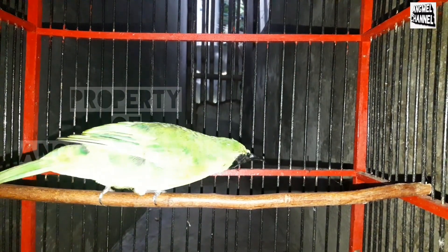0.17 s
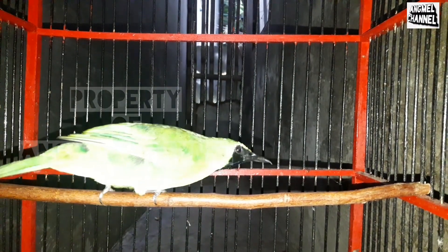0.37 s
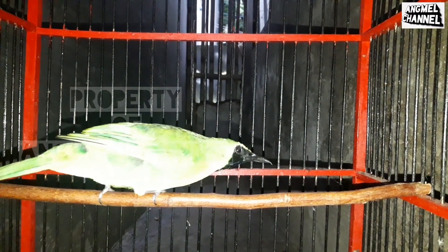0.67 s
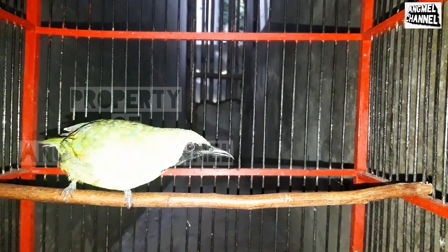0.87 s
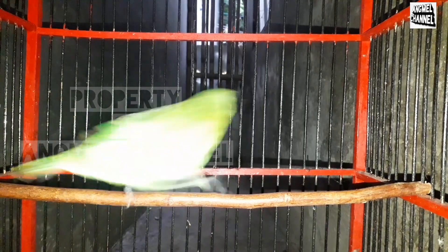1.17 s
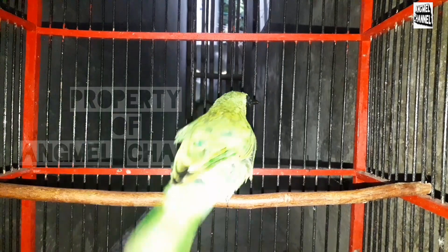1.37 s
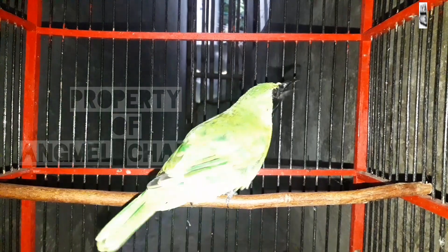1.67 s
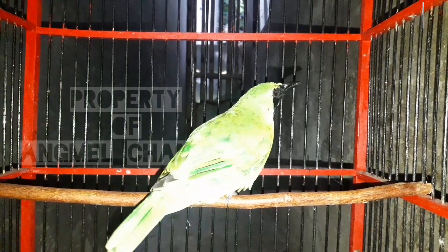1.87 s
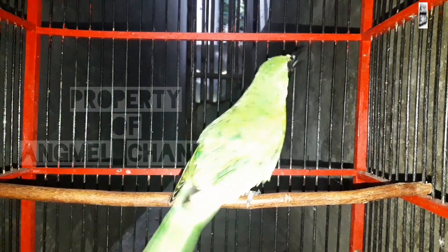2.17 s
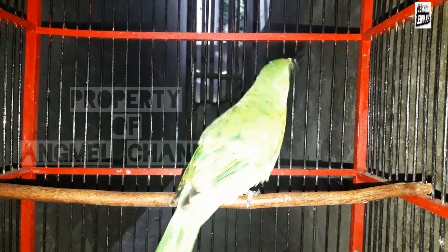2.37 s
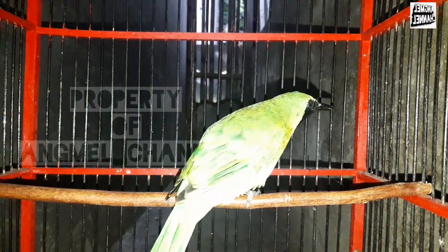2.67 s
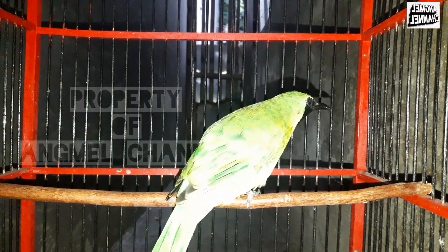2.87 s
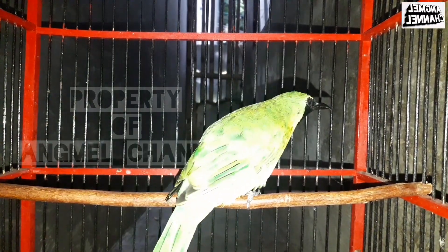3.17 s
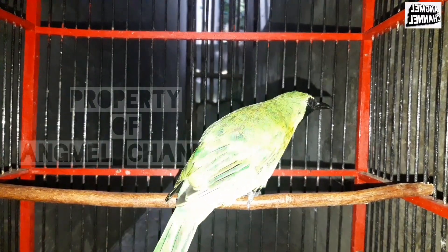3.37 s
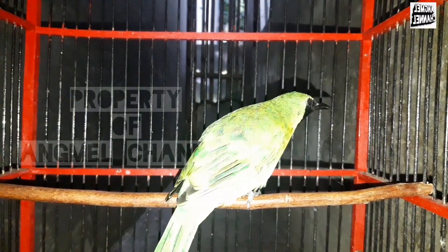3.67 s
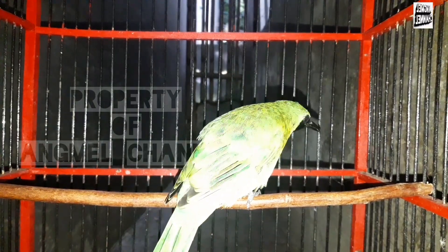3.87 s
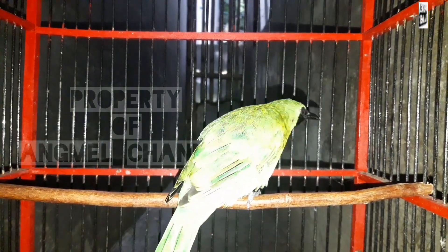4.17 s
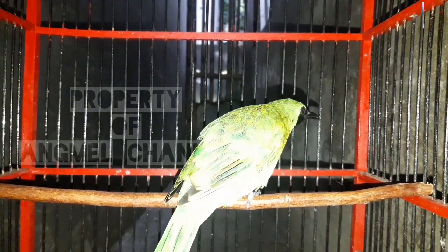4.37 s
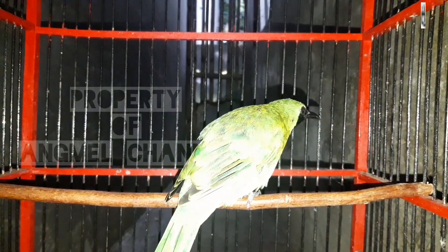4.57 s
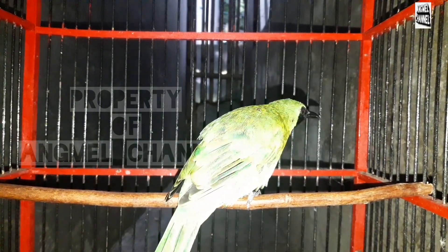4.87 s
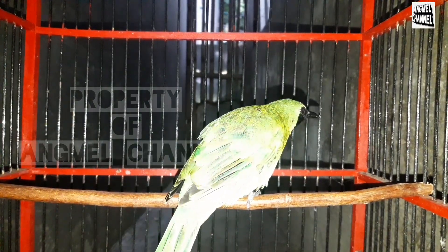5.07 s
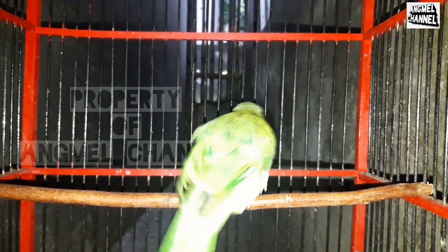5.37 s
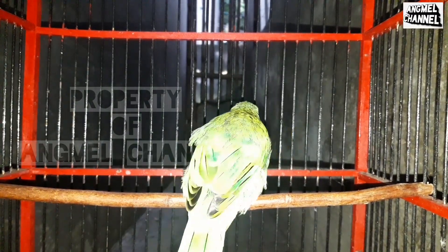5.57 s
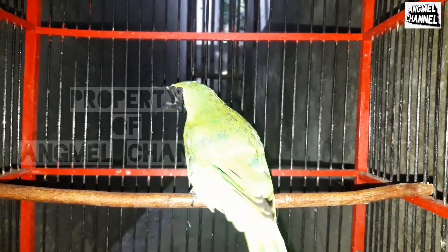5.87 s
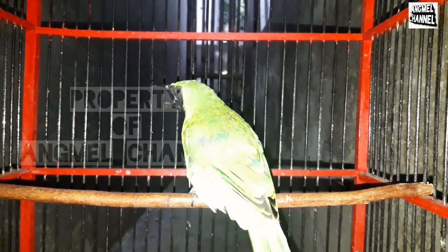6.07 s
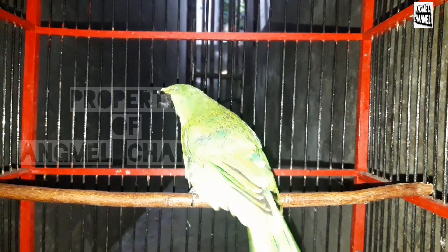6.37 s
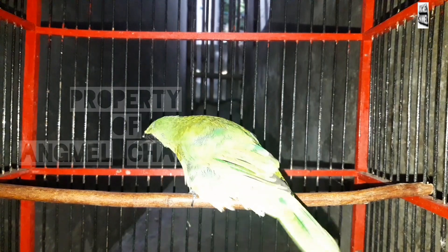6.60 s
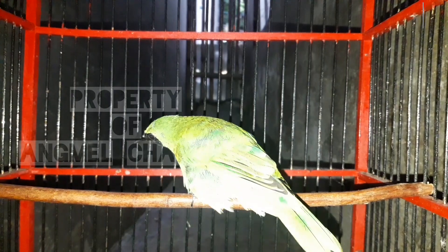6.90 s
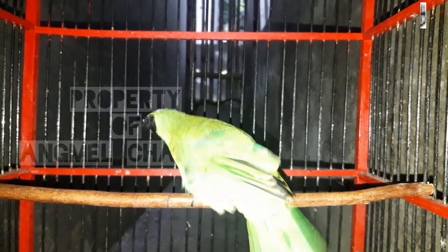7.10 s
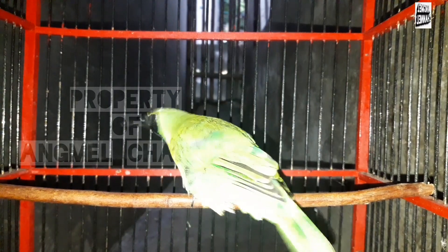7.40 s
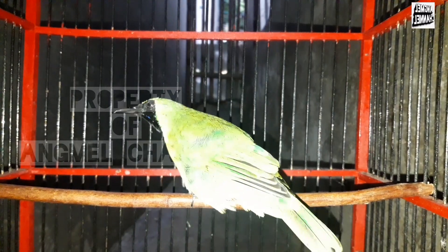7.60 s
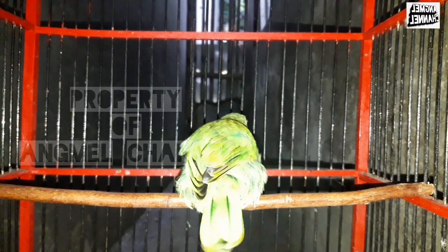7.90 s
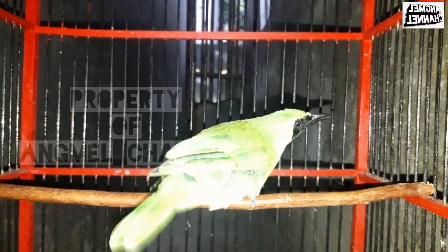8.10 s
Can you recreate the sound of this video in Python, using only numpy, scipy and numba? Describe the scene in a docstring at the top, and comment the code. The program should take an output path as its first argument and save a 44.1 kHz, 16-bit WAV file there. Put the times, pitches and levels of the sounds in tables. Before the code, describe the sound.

A close caged songbird sings two short phrases, each two sharp chips then three falling whistles, over faint low distant traffic hum.

```python
"""Distant traffic hums outside, with a waver of engine hum, faint tones and hiss; it cuts out once, briefly.
Then a caged songbird, close to the microphone, sings two sharp two-voiced chips and three falling whistles;
after a pause with light ticks of claws and feathers, it sings a second such phrase. Gliding sine tones make
the voice, coloured noise the scratches and clicks. A small hard room rings after each note, and the
recorder's gain control ducks the background during each phrase and lets it back afterwards."""
import sys
import numpy as np
from scipy import signal
from scipy.fft import rfft, irfft
from scipy.io import wavfile
from scipy.ndimage import uniform_filter1d, minimum_filter1d
from numba import njit

SR = 44100
rng = np.random.default_rng(int(sys.argv[2]) if len(sys.argv) > 2 else 0)


def to_wav(sig):
    """Store sig (one row per channel, or 1-D mono) as 16-bit WAV at the path in sys.argv[1].

    Samples outside -1..1 are clipped; the rate is SR.
    """
    pcm = np.clip(np.atleast_2d(sig), -1, 1) * 32767
    pcm = np.round(pcm).astype(np.int16)
    wavfile.write(sys.argv[1], SR, pcm.T)  # frames by channels


N = 363384
TIME = np.arange(N) / SR


def undb(db):
    """Decibels to gain."""
    return 10 ** (np.asarray(db) / 20)


def ease(part):
    """Smooth step from 0 to 1."""
    return np.sin(np.pi / 2 * np.clip(part, 0, 1)) ** 2


def noise(colour):
    """Noise of rms 1 with a spectrum drawn through (pitch_hz, level_db) points."""
    hz, db = np.transpose(colour)
    bins = np.maximum(np.fft.rfftfreq(N, 1 / SR), 1)
    gain = undb(np.interp(np.log(bins), np.log(hz), db))
    x = irfft(rfft(rng.standard_normal(N)) * gain, N)
    return x / x.std()


def walk(rate):
    """Smooth random wandering of spread 1, about rate turns a second."""
    size = max(int(SR / rate), 1)
    steps = np.interp(np.arange(N) / size, np.arange(N), rng.standard_normal(N))
    x = uniform_filter1d(steps, size)
    return x / x.std()


def swell(at, half):
    """A bell-shaped rise and fall around a moment."""
    out = np.zeros(N)
    near = slice(*np.searchsorted(TIME, (at - 4 * half, at + 4 * half)))
    out[near] = np.exp(-((TIME[near] - at) / half) ** 2)
    return out


def bursts(table, colour):
    """Short swells of coloured noise, from (centre_s, half_length_s, level_db) rows."""
    return noise(colour) * sum(undb(db) * swell(s, half) for s, half, db in table)


# The song, close to the microphone. Each note arches up to a crest, falls to a landing pitch, then drifts
# to its end; a roundness of 1 is a straight rise. Columns of both: start_s, length_s, rise_s, fall_s,
# first_hz, crest_hz, landing_hz, drift_hz_per_s, roundness, level_db, fade_db_per_s, overtones_db, scratch_db
CHIP_NOTES = [(1.577, 0.12, 0.033, .025, 3816, 4410, 3783, -900, 2.2, 5.5, -49, -0.5, -29.5),
              (1.738, 0.1, .049, 0.015, 4030, 4430, 4347, -3000, 1.0, 4, -15.5, -0.5, -43.5),
              (5.876, 0.15, 0.043, .032, 3978, 4460, 3862, -1600, .7, 1.5, -45.5, -2.5, -34.5),
              (6.041, 0.12, 0.031, 0.053, 4170, 4530, 4577, -400, .8, -3.5, -13, 5.5, -50)]
WHISTLE_NOTES = [(2.1, 0.093, 0.017, 0.061, 3327, 3630, 2903, 9000, 2.2, 3.8, -54.5, 1, -43.5),
                 (2.282, 0.093, .013, 0.046, 2850, 2997, 2537, -970, 0.92, 1.2, -50, -1.5, -45.5),
                 (2.462, 0.1, 0.03, 0.048, 2810, 3274, 2874, -3200, 1.7, 4.5, -32, -1.5, -40),
                 (6.356, 0.12, .032, 0.041, 3200, 3467, 3055, 597.5, 2.6, 3.83, -23, 2, -43),
                 (6.551, 0.076, 0.0043, .048, 2840, 2936, 2566, -1200, 1.7, 3.3, -11.5, -2, -40.5),
                 (6.749, 0.091, 0.033, .036, 3010, 3424, 2872, -3000, .9, 0.62, 52, -1, -56.5)]
# Upward flicks from the other side of the syrinx, one in each chip.
# Columns: start_s, length_s, level_db, scratch_db, pop_db
FLICK_NOTES = [(1.619, 0.024, -6.5, -20.5, -22.5), (1.784, 0.011, -6.5, -26.5, -29),
               (5.92, 0.025, -7.5, -27, -40), (6.077, 0.022, -5.5, -24, -51)]
# Strength of the overtones, reedier on high notes. Columns: multiple of the pitch, low_note_db, high_note_db
SONG_OVERTONES = [(2, -35.5, -31.5), (3, -36.5, -28.5), (4, -49, -39), (5, -40.5, -38.5), (6, -37, -40.5)]
# The same for the buzzier flicks. Columns: multiple of the pitch, low_note_db, high_note_db
BUZZ_OVERTONES = [(2, -19.5, -10), (3, -27.5, -31.5), (4, -33, -34.5)]
# Spectra of the scratch, the low pop and the crisp click. Columns: pitch_hz, level_db
SCRATCH_SPECTRUM = [(200, -17), (1000, -23), (2800, -3.5), (4400, 5.5), (5600, -13.5), (7500, 3),
                    (10000, -13.5), (12500, -9), (16000, -1.5)]
POP_SPECTRUM = [(30, -25.5), (200, 4.5), (750, -2.5), (1300, -9.5), (2500, -31.5), (8000, -60)]
CLICK_SPECTRUM = [(200, -23), (1000, -15), (1800, 1.5), (3400, 2.5), (5000, -3.5), (6500, -15.5),
                  (15000, -26)]
CLICK_LEAD_S, CLICK_HALF_S = 0.003, 0.0062
CHIP_CLICK_DB, WHISTLE_CLICK_DB = 5, 7  # above the note's scratch
POP_DELAY_S, POP_HALF_S = 0.011, 0.0023  # delay after the start of the flick


def bird(coupling_db=-42, crackle_db=4):
    """Both sides of the syrinx; sounding together they make sum and difference tones and a crackly scratch."""
    chips = [arch(row, attack=0.013, release=0.016, scoop_hz=1700) for row in CHIP_NOTES]
    whistles = [arch(row, attack=0.021, release=0.015, scoop_hz=250) for row in WHISTLE_NOTES]
    song, overtones = syrinx(chips + whistles, SONG_OVERTONES)
    upstrokes = [upstroke(start, length, db) for start, length, db, *_ in FLICK_NOTES]
    flick, buzz = syrinx(upstrokes, BUZZ_OVERTONES, jitter=0.053)
    both_sides = undb(coupling_db) * song * flick  # the product holds the sum and difference tones
    scratch = bursts(catches(), SCRATCH_SPECTRUM) * undb(crackle_db * walk(900))
    pops = [(start + POP_DELAY_S, POP_HALF_S, db) for start, *_, db in FLICK_NOTES]
    clicks = [(start - CLICK_LEAD_S, CLICK_HALF_S, db + above)
              for table, above in ((CHIP_NOTES, CHIP_CLICK_DB), (WHISTLE_NOTES, WHISTLE_CLICK_DB))
              for start, *_, db in table]
    knocks = bursts(pops, POP_SPECTRUM) + bursts(clicks, CLICK_SPECTRUM)
    return song + overtones + flick + buzz + both_sides + scratch + knocks


LOW_HIGH_HZ = (3200, 4330)  # pitch of a low whistle and of a high chip
QUAVER, QUAVER_PER_S = 0.0028, 90  # unsteadiness as a share of the pitch, and its pace


def syrinx(notes, partials, jitter=0.0016, catch_jitter=0.02, catch_spread=1.3, shimmer_db=1.5, flutter_db=4.0):
    """One vibrating membrane: a nearly pure gliding tone; returns it and its weak, fluttering overtones."""
    in_order = sorted(notes, key=lambda note: note[0][0])
    s, *controls = np.hstack(in_order)
    hz, size, reed = (np.interp(TIME, s, c) for c in controls)
    # the pitch grows unsteady wherever the voice catches, the more so the louder the scratch
    catch = sum(undb(db) * swell(at, catch_spread * half) for at, half, db in catches())
    roughness = catch_jitter * catch / catch.max() * walk(1200)
    hz = hz * (1 + QUAVER * walk(QUAVER_PER_S) + jitter * walk(500) + roughness)
    size = size * undb(shimmer_db * walk(300))
    phase = 2 * np.pi * np.cumsum(hz) / SR
    overtones = np.zeros(N)
    for multiple, *low_high_db in partials:
        level = undb(np.interp(hz, LOW_HIGH_HZ, low_high_db) + flutter_db * walk(150))
        audible = multiple * hz < SR / 2
        overtones += level * np.sin(round(multiple) * phase) * audible
    return size * np.sin(phase), size * reed * overtones


SCOOP_S = 0.0024  # time constant of the opening scoop


def arch(row, attack, release, scoop_hz):
    """One note as (times, pitch, size, reediness): scoop, rounded rise, smooth fall and drift."""
    (start, length, rise, fall, first_hz, crest_hz, landing_hz, drift,
     roundness, db, fade, reed_db, _) = row
    age = np.arange(int(length * SR)) / SR
    scoop = scoop_hz * np.exp(-age / SCOOP_S)
    rising = (first_hz - crest_hz) * np.maximum(1 - age / rise, 0) ** roundness
    falling = (landing_hz - crest_hz) * ease((age - rise) / fall)
    drifting = drift * np.maximum(age - rise - fall, 0)
    pitch = crest_hz + rising - scoop + falling + drifting
    size = undb(db + fade * age) * np.minimum(age / attack, 1) * ease((age[-1] - age) / release)
    return start + age, pitch, size, np.full_like(age, undb(reed_db))


FLICK_FROM_HZ, FLICK_TO_HZ, FLICK_ROUNDNESS = 2650, 3700, 2.0


def upstroke(start, length, db):
    """One flick as (times, pitch, size, reediness): it swells and dies as its pitch shoots up and levels off."""
    part = np.linspace(0, 1, int(length * SR))
    pitch = FLICK_TO_HZ + (FLICK_FROM_HZ - FLICK_TO_HZ) * (1 - part) ** FLICK_ROUNDNESS
    size = undb(db) * np.sin(np.pi * part) ** 2
    return start + length * part, pitch, size, np.ones_like(part)


SCRATCH_LEAD_S, SCRATCH_HALF_S = 0.0002, 0.0046  # lead is ahead of the note
CLOSING_LEAD_S, CLOSING_HALF_S, CLOSING_DB = 0.014, 0.004, -46.5  # lead is before a whistle's end
FLICK_SCRATCH_SHARE = 0.65  # half length of its scratch, as a share of the flick


def catches():
    """Scratches as notes open, whistles close and flicks sound: (centre_s, half_length_s, level_db)."""
    starts = [(start - SCRATCH_LEAD_S, SCRATCH_HALF_S, db) for start, *_, db in CHIP_NOTES + WHISTLE_NOTES]
    ends = [(start + length - CLOSING_LEAD_S, CLOSING_HALF_S, CLOSING_DB)
            for start, length, *_ in WHISTLE_NOTES]
    flicks = [(start + length / 2, FLICK_SCRATCH_SHARE * length, db)
              for start, length, _, db, _ in FLICK_NOTES]
    return starts + ends + flicks


# Light ticks of claws and feathers in the cage. Columns: start_s, decay_s, level_db
PERCH_TICKS = [(.608, 0.0036, -45), (1.209, 0.0098, -46), (4.367, .005, -45), (4.429, 0.0039, -49),
               (5.586, 0.0028, -52.5), (5.739, 0.0047, -51.5), (7.684, 0.007, -49), (8.202, 0.0062, -52)]
# Spectrum of a tick. Columns: pitch_hz, level_db
TICK_SPECTRUM = [(300, -1), (1500, 1), (4000, 6.5), (9000, -1.5), (15000, -1.5)]


def perch():
    """Small dry ticks as the bird shifts about: noise that starts at once and dies exponentially."""
    envelope = sum(undb(db) * (TIME >= s) * np.exp(-np.abs(TIME - s) / decay) for s, decay, db in PERCH_TICKS)
    return noise(TICK_SPECTRUM) * envelope


# Reflections from surfaces near the bird. Columns: delay_s, level_db
NEAR_SURFACES = [(.003685, -15), (.004864, -12.5), (.006088, -20.5), (0.0156, -14.5), (0.0156, -14.5),
                 (.0234, -13.5)]
ROOM_T60_S, TREBLE_T60_S, ROOM_BUILD_S = 0.27, 0.23, 0.018
ROOM_DB, TREBLE_ROOM_DB = -8, 2.5  # diffuse tail, and the extra treble that comes by way of the walls


def room(x, split_hz=6000):
    """Direct sound, a few distinct reflections and a short diffuse tail whose treble dies first."""
    t = TIME[:SR // 2]
    build = (1 - np.exp(-(t / ROOM_BUILD_S) ** 2)) ** 2
    scatter = rng.standard_normal(len(t)) * build
    low = signal.sosfiltfilt(signal.butter(4, split_hz, fs=SR, output="sos"), scatter)
    treble = undb(TREBLE_ROOM_DB) * (scatter - low)
    slow, fast = (np.exp(-np.log(1000) * t / t60) for t60 in (ROOM_T60_S, TREBLE_T60_S))
    response = undb(ROOM_DB) * (low * slow + treble * fast) / np.linalg.norm(scatter * slow)
    response[0] = 1  # direct sound
    for delay, db in NEAR_SURFACES:
        response[int(delay * SR)] += undb(db)
    return signal.fftconvolve(x, response)[:N]


# A distant engine outside. Columns: time_s, firing_rate_hz, fundamental_db, second_harmonic_db
DISTANT_ENGINE = [(0, 42.26, -50, -46), (.95, 57, -53, -40.5), (1.5, 57.06, -60.5, -36.5),
                  (2.1, 57.15, -56, -44), (2.7, 60.35, -39, -49), (4.4, 57.7, -47, -70),
                  (5.8, 53.97, -53.5, -58), (6.399, 49.6, -47.5, -46), (7, 42.6, -54, -51.5),
                  (8.2, 39.66, -64.5, -74)]
# Faint far-off tones that swell and fade. Columns: centre_s, half_length_s, pitch_hz, level_db
DISTANT_TONES = [(.55, 0.29, 132, -38), (3.413, 0.097, 814, -45.5), (3.679, 0.032, 1164, -49),
                 (4.041, 0.15, 411, -48), (4.211, 0.086, 807, -51.5), (5.062, 0.031, 775, -49),
                 (6.195, 0.16, 140.6, -35)]
# Spectra of the traffic rumble and of the smooth hiss. Columns: pitch_hz, level_db_per_hz
TRAFFIC_SPECTRUM = [(15, -43), (25, -20), (48, -14.5), (80, -1), (128, 0), (184, -6), (218, -16.5),
                    (303, -12.5), (400, -14), (460, -18), (544, -15), (678, -19), (1180, -17.5),
                    (2000, -22.5), (2600, -52), (4400, -120)]
HISS_SPECTRUM = [(1000, -23.5), (1700, -9), (2100, 0.5), (2700, -2), (4200, -3.5), (5200, -9.5),
                 (7400, -8.5), (8100, -19.5), (15500, -18)]
RUMBLE_DB, HISS_DB = -38.5, -51.5
TRAFFIC_SWELL_DB, TRAFFIC_PER_S = 0.51, 0.71  # depth and pace of the slow swells


def outside(waver_db=2):
    """Traffic rumble and smooth hiss as shaped noise; an engine's wavering hum and far tones as sines."""
    s, *columns = np.transpose(DISTANT_ENGINE)
    hz, first_db, second_db = (np.interp(TIME, s, c) for c in columns)
    phase = 2 * np.pi * np.cumsum(hz * (1 + 0.012 * walk(13.0))) / SR
    hum = undb(first_db) * np.sin(phase) + undb(second_db) * np.sin(2 * phase)
    hum += undb(-52.5) * np.sin(3 * phase)
    clock = np.cumsum(1 + 0.005 * walk(30)) / SR  # uneven time makes the tones' pitch drift
    tones = sum(undb(db) * swell(at, half) * np.sin(2 * np.pi * f * clock) for at, half, f, db in DISTANT_TONES)
    # the root of 2 makes a sine's level an rms level, like the noise
    tonal = np.sqrt(2) * (hum + tones) * undb(waver_db * walk(11))
    busy = undb(TRAFFIC_SWELL_DB * walk(TRAFFIC_PER_S))
    rumble = noise(TRAFFIC_SPECTRUM) * undb(RUMBLE_DB + 0.37 * walk(4.0))
    hiss = undb(HISS_DB) * noise(HISS_SPECTRUM)
    return tonal + busy * (rumble + hiss)


def scene():
    """The bird in its room over the sound from outside."""
    return (room(bird() + perch()) + outside())[None]


@njit
def ride(peak_db, top_db, active_db, depth_db, attack, hold, release):
    """Gain in dB: falls while the sound is over the top, holds while it stays loud, then climbs back."""
    out, gain, wait = np.empty(len(peak_db)), 0., 0.
    for i in range(len(peak_db)):
        if peak_db[i] + gain > top_db:
            gain = max(gain - attack / SR, -depth_db)
        wait = hold if peak_db[i] + gain > active_db else wait - 1 / SR
        if wait < 0:
            gain = min(gain + release / SR, 0.)
        out[i] = gain
    return out


def peaks(x, size=256):
    """Smooth envelope over the waveform's crests."""
    crests = -minimum_filter1d(-np.abs(x), size)
    return uniform_filter1d(crests, size) + 1e-9


DROPOUT_START_S, DROPOUT_END_S = 0.840, 0.858
TOP_HZ = 15800  # edge of the top cut


def record(dry, top_db=0.0, active_db=-10.0, depth_db=10.0, attack_db_per_s=303.5, hold_s=0.48,
           release_db_per_s=21.5):
    """Gain control with a hold, a fast peak limiter, one brief dropout and a steep top cut."""
    x = dry[0]
    peak_db = 20 * np.log10(peaks(x))
    x = x * undb(ride(peak_db, top_db, active_db, depth_db, attack_db_per_s, hold_s, release_db_per_s))
    x = x * np.minimum(1, 0.93 / peaks(x))
    x = x * ((TIME < DROPOUT_START_S) | (TIME > DROPOUT_END_S))
    top_cut = signal.ellip(10, 0.1, 80, TOP_HZ, fs=SR, output="sos")
    return signal.sosfilt(top_cut, x)[None]


dry = scene()
out = record(dry)
to_wav(out)
```